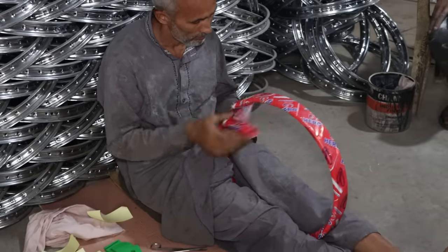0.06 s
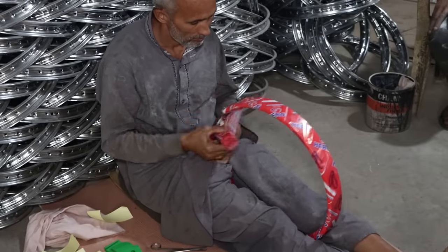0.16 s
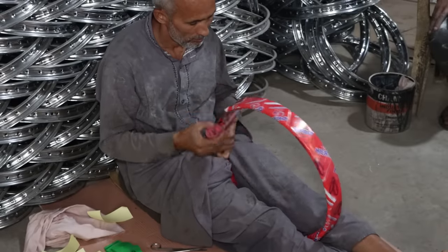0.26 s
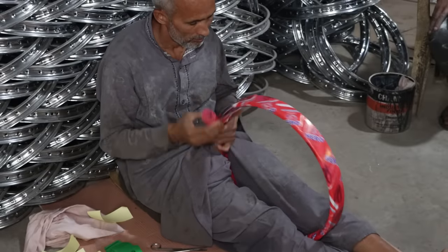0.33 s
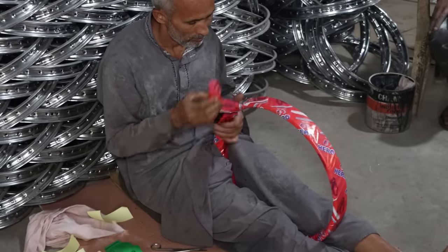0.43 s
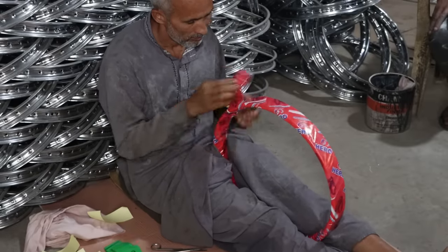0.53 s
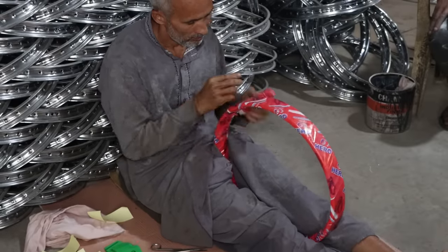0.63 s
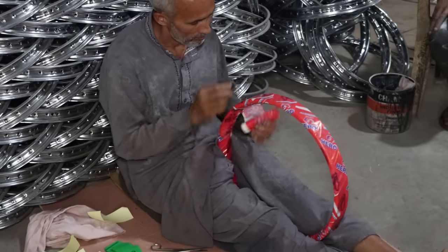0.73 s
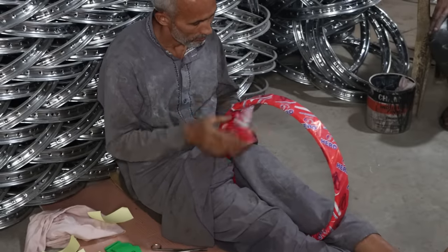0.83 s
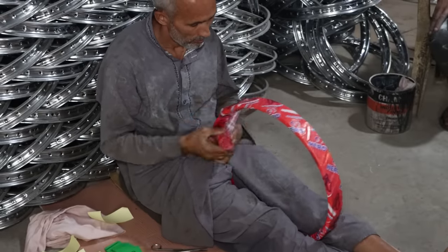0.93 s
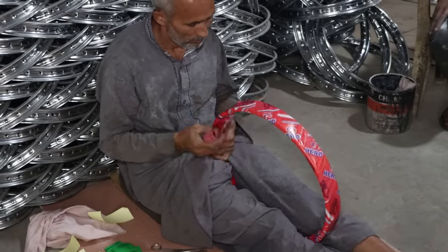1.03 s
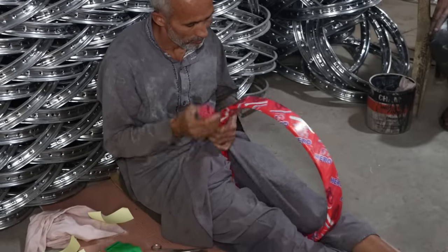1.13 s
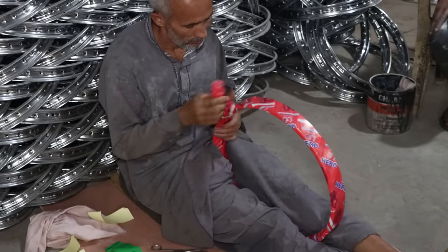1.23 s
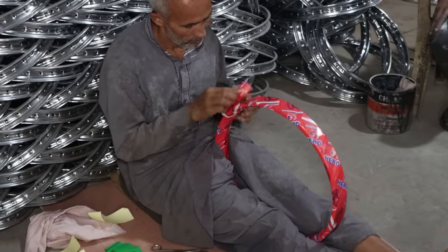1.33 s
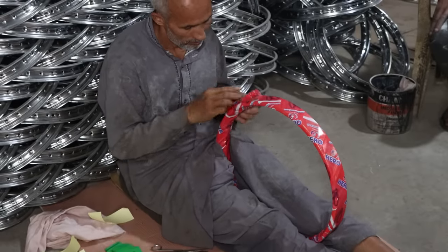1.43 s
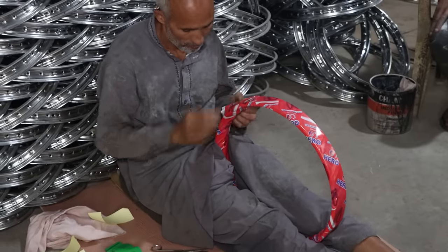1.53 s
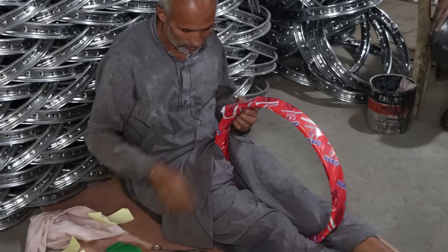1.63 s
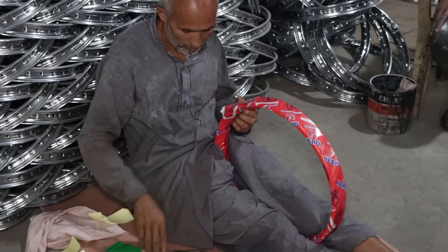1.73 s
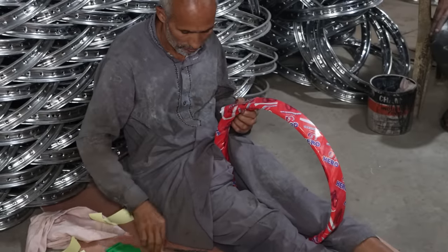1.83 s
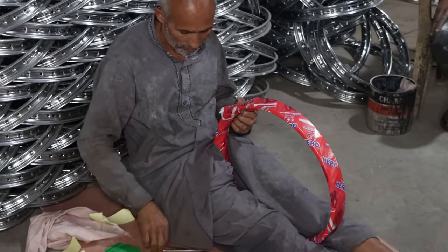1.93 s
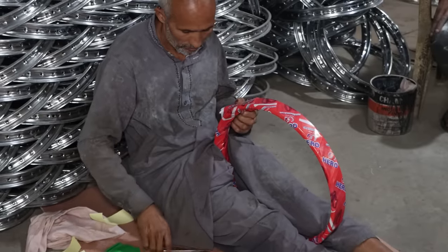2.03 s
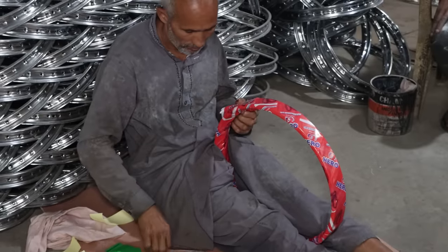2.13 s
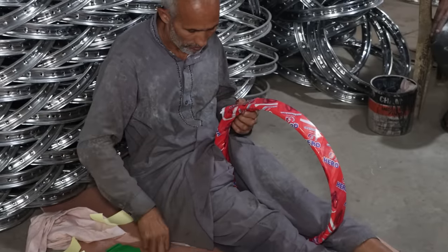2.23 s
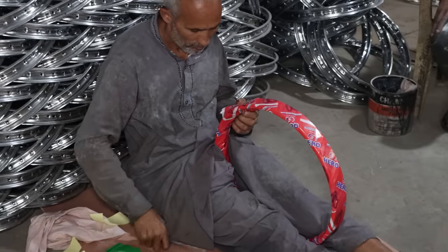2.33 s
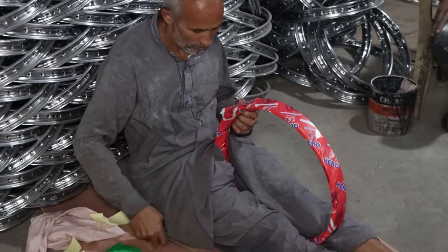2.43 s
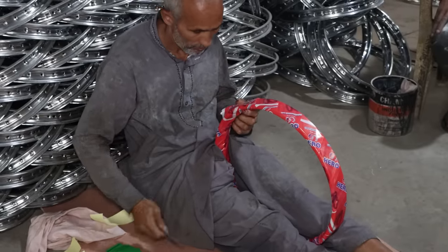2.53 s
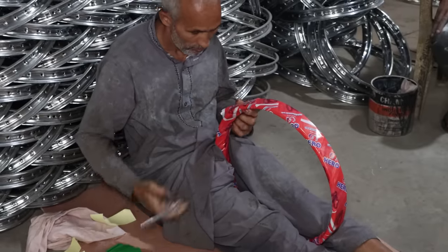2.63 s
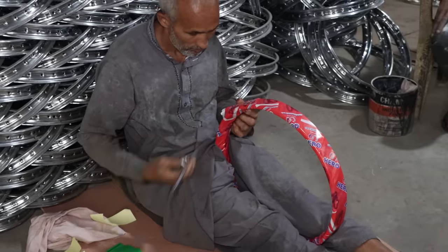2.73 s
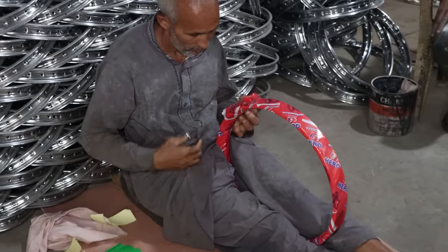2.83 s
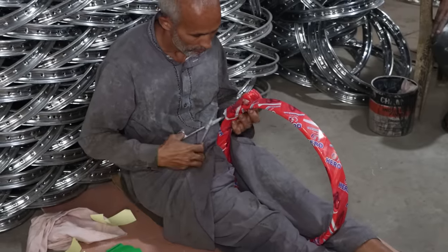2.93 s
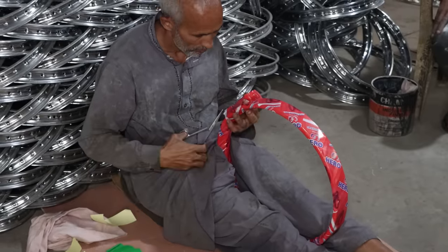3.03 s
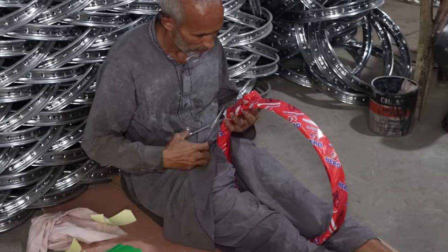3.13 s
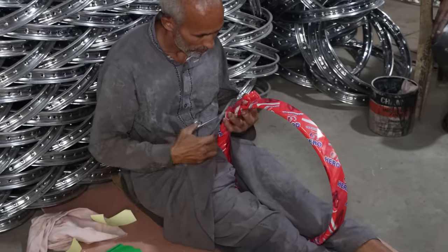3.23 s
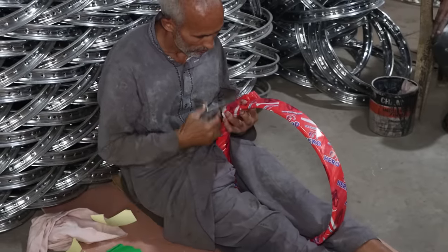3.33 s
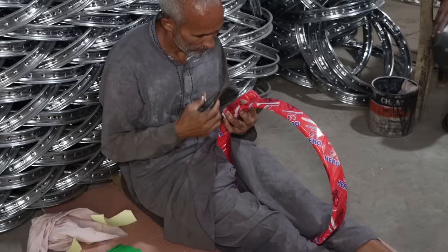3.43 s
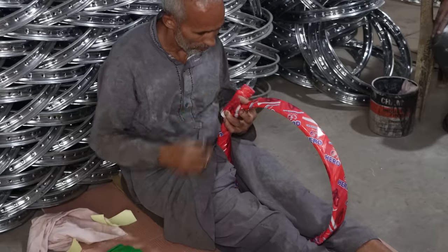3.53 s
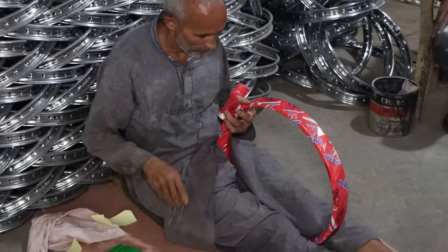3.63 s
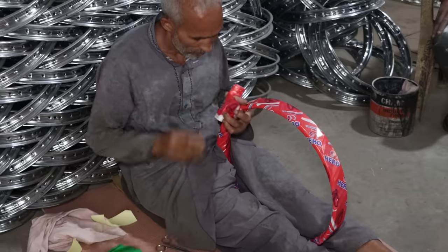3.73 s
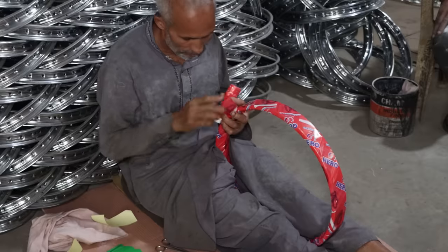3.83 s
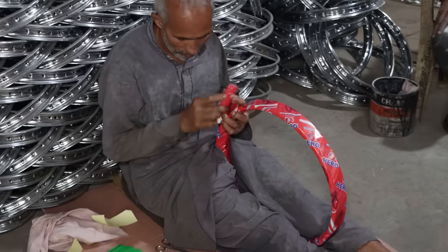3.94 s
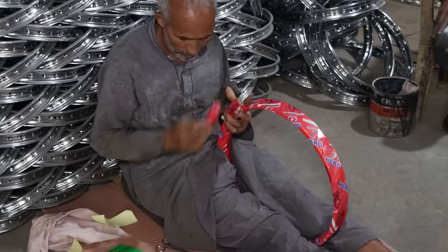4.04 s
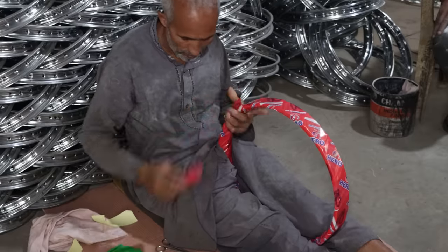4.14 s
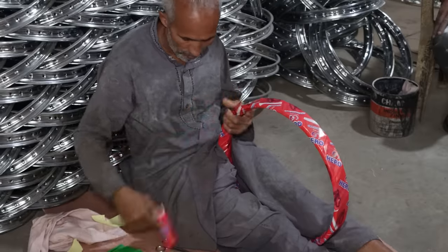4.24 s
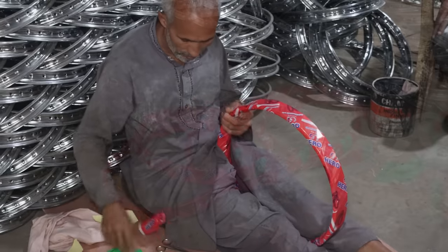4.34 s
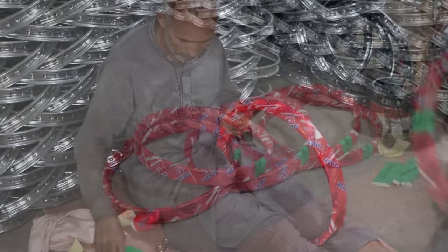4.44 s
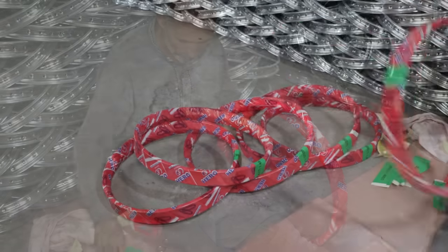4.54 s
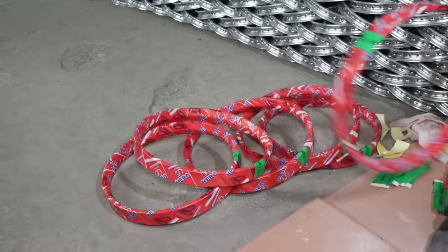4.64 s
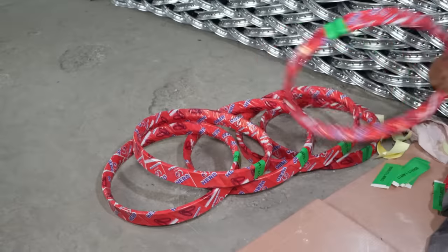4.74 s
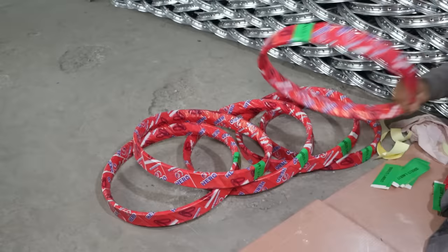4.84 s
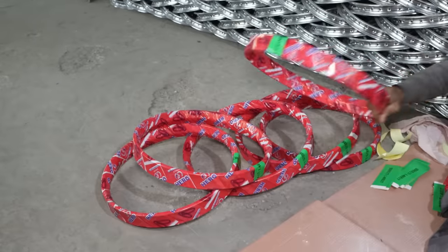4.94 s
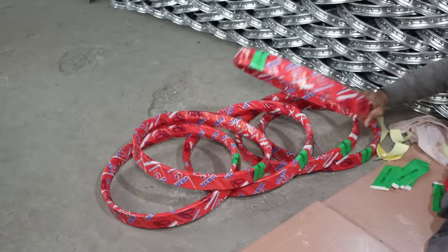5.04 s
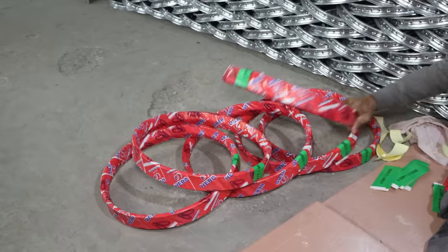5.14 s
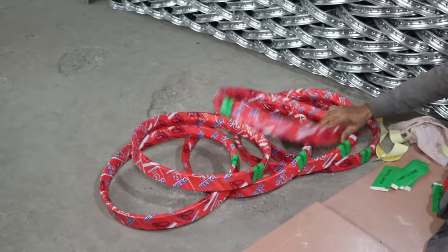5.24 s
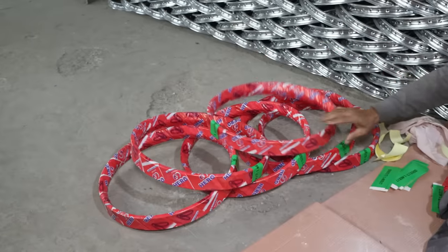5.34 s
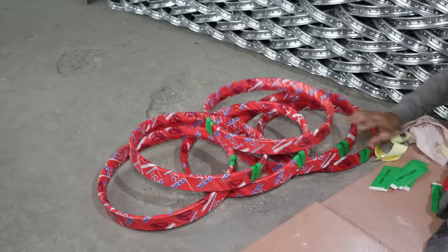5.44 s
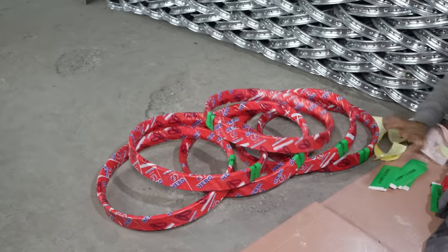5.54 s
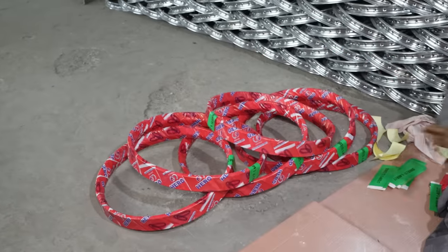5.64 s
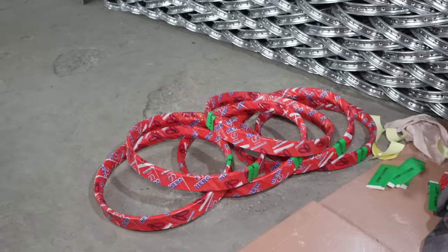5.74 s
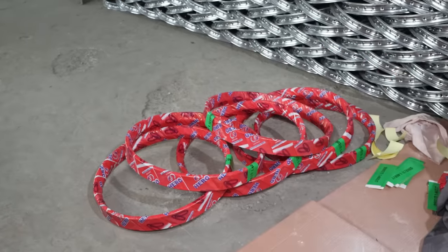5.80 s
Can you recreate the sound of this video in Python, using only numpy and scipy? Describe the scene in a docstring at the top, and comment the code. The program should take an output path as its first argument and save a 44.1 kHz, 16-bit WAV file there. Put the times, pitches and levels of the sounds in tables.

```python
"""A machine throbs nine times a second in a workshop while a wheel rim is wrapped in tape: the tape rustles,
scissors snip and tap as they are picked up off the floor, something thuds far off and something hard knocks.
The throb starts to fade, then the wrapped steel rim is dropped on a pile of others, which clash, rattle and ring.
Metal rings as decaying sines and jostled noise; tape, thuds and hiss are coloured, enveloped noise;
the machine is a set of steady tones, one pulsing tone and looped clatter."""
import sys
import numpy as np
from scipy import signal
from scipy.fft import rfft, irfft, next_fast_len
from scipy.io import wavfile
from scipy.ndimage import map_coordinates

SR = 44100
rng = np.random.default_rng(int(sys.argv[2]) if len(sys.argv) > 2 else 0)


def dump_mix(stems):
    """Bounce the given channels to the path in sys.argv[1] as a 16-bit WAV at rate SR."""
    frames = np.atleast_2d(stems).T  # one column per channel
    limited = np.clip(frames, -1, 1)  # hard clip at full scale
    pcm = np.round(limited * 32767).astype(np.int16)
    wavfile.write(sys.argv[1], SR, pcm)


N = 258867

# In every noise colour the density is relative: noise() then scales the result to rms 1.
# colour of the machine noise in the hall: [pitch_hz, density_db_per_hz]
HALL_COLOUR = [(20, -37), (40, -10), (90, -15), (125, -4), (200, -0.5), (270, 3), (340, -2), (520, -1.5),
               (650, -7), (1000, -9), (1950, -8.5), (2130, -13.5), (5500, -23.5), (8000, -28.5),
               (13500, -39), (16000, -49)]
# left-right likeness of diffuse and of near sounds: [pitch_hz, likeness_0_to_1]
DIFFUSE = [(100, 0.98), (300, 0.97), (600, 0.72), (1200, 1), (3000, 0.04), (12000, 0)]
NEAR = [(200, 0.86), (1000, 0.63), (3000, 0.12), (12000, 0.21)]
# left-right likeness of the pile of rims: [pitch_hz, likeness_0_to_1]
PILE = [(300, 1), (1000, 0.81), (2500, 0.43), (12000, 0.11)]
# colour of scissor blades, also of the crack in each rim blow: [pitch_hz, density_db_per_hz]
BLADE_COLOUR = [(500, -9), (2200, 10), (3200, 5), (4500, 5.5), (6500, 2.5), (12000, 3), (16000, -9)]
# rim against rim: [start_s, level_db, brightness_db_per_octave, clash_t60_s, relative_ring_db, clank_hz]
BLOWS = [(5.2647, -15.5, -1.5, 0.11, -18, 2100), (5.287, -22, 1, 0.053, -29, 4400),
         (5.397, -5, 1, 0.11, -29, 1160), (5.4324, -8.5, 7.5, 0.092, -17.5, 1770),
         (5.4488, -11.5, 10, 0.1, -34, 4660), (5.596, -21, 1, 0.25, -15, 4220),
         (5.6254, -15.5, -0.5, 0.087, -20, 1150), (5.64, -16.5, -2.5, 0.16, -24, 1590),
         (5.714, -23.5, -1, 0.14, -28, 1550)]
# strong modes of a steel rim: [pitch_hz, relative_db, t60_s]
RIM_MODES = [(517, -11, 1.3), (797, -15, .8), (1055, -3, .9), (1437, -16, .6), (1712, 0.5, 1.15),
             (1750, -2.5, .9), (1834, -14, .5), (2256, -6, .65), (2342, -5.5, .5), (2379, -8, .65),
             (2878, -3.5, .75), (3402, -4.5, .5), (3585, -2.5, .45), (3640, -7, .38), (4016, -10, .38),
             (4059, -3.5, .45), (4355, -3.5, .4), (4727, -10, .25), (4867, -9, .3), (5103, -11, .3),
             (5195, -7, .32), (5512, -14, .3)]

# how far the strong modes stand out of the crowd: little in the clash, much in what follows
CLASH_BUNCHING, AFTER_BUNCHING = 1.8, 9
STROKE_HZ = 9.2665  # machine strokes per second


def rims():
    """Each blow cracks and clashes in crowded modes that leave the strong ones ringing; the pile slides and settles."""
    # direction of the pile: [pitch_hz, left_minus_right_db]
    bearing = [(300, -0.5), (1000, 0), (2200, -4), (4000, 0), (8000, -2)]
    out, t = np.zeros((2, N)), np.arange(2 * SR // 3) / SR
    contact = 1 - np.exp(-t / 0.00024)  # the tape cushions the first touch
    for s, db, bright_db, t60, _, clank_hz in BLOWS:
        clash_colour = lambda hz: steel(CLASH_BUNCHING, bright_db)(hz) * favoured(hz, clank_hz)
        clash = fade(t, t60) * noise(clash_colour, PILE, len(t))
        after = amp(-17) * fade(t, 0.69) * noise(steel(AFTER_BUNCHING, bright_db / 2), PILE, len(t))
        crack = amp(-13) * fade(t, 0.0091) * noise(colour(BLADE_COLOUR), PILE, len(t))
        add(out, s, amp(db) * contact * (clash + after + crack))
    sideways = lambda hz: amp(along(bearing, hz) * np.array([[.5], [-.5]]))
    return filtered(in_hall(out + ringing() + sliding(), wet_db=-6.0, dull_hz=8040), sideways)


def ringing():
    """Every blow feeds more energy into the same modes, so they ring on through the clatter; close pairs beat."""
    start = BLOWS[0][0]
    out, t = np.zeros((2, N)), np.arange(SR) / SR
    for hz, db, t60 in RIM_MODES:
        feeds = []
        for s, blow_db, _, _, ring_db, clank_hz in BLOWS:
            since_blow = t - s + start
            strength = amp(blow_db + ring_db + 1.5 * rng.standard_normal())  # uneven from blow to blow
            struck = (t >= s - start) * strength * np.sqrt(favoured(hz, clank_hz))
            feeds.append(struck * fade(np.abs(since_blow), t60))
        steady = ring([(hz, db, np.inf)], t, scatter_db=0, spread=.55, rough=.5)
        add(out, start, np.linalg.norm(feeds, axis=0) * steady)  # energies add
    return out


def sliding():
    """A sliding rim bumps along on its wrapping and sets off a run of small steel-on-steel taps."""
    # brush, landing slide, rocking, settling:
    # [start_s, length_s, bump_rise_db_per_s, padded_bump_db, bare_steel_rattle_db]
    slides = [(5.201, .05, 170, -36.5, -58), (5.303, 0.11, 140, -30.5, -31), (5.58, 0.042, 100, -48, -23),
              (5.624, 0.043, 328, -29.5, -22), (5.709, 0.042, 334, -29.5, -27.5)]
    # colour of wrapped rims bumping: [pitch_hz, density_db_per_hz]
    padded = [(40, -53), (130, -13), (300, -4), (520, -2.5), (1000, -6), (1600, -11), (2200, -15),
              (5000, -32), (16000, -40)]
    taps_per_s, tap_t60_s = 85, .045
    bump_fall, rattle_fall = 87, 182  # dB per second: the bumping outlasts the rattle
    rattle_steeper = 2  # the rattle needs more speed, so it sets in this many times as steeply

    bumps, rattles = [], []
    for s, length, rise, bump_db, rattle_db in slides:
        bumps.append(amp(bump_db) * stroke(s, length, rise, bump_fall))
        rattles.append(amp(rattle_db) * stroke(s, length, rattle_steeper * rise, rattle_fall))
    bump, rattle = np.max(bumps, axis=0), np.max(rattles, axis=0)

    taps, t = np.zeros((2, N)), np.arange(SR // 10) / SR
    for beat in np.arange(slides[0][0], N / SR, 1 / taps_per_s):
        s = beat + (rng.random() - .5) / taps_per_s
        size = rattle[min(round(s * SR), N - 1)] * amp(2.8 * rng.standard_normal())
        add(taps, s, size * fade(t, tap_t60_s) * noise(steel(AFTER_BUNCHING / 2), PILE, len(t)))
    return taps + bump * crackle(rate=170, life=0.019, scatter_db=1) * noise(colour(padded), PILE, N)


def steel(bunching, bright_db=0):
    """Colour of a clash: the rims are alike, so their modes bunch around the strong ones of a single rim."""
    # the crowd of weaker modes: [pitch_hz, density_db_per_hz]
    crowd = [(40, -32), (200, -18), (500, -4), (1000, 0.5), (1700, 4), (2080, -3.5), (2400, 1.5),
             (4200, -2), (5500, -9.5), (5800, -7.5), (6400, -10), (9000, -22.5), (16000, -37)]

    def gain(f):
        bunches = 0
        for hz, db, _ in RIM_MODES:
            bunches = bunches + amp(db / 2) / (1 + ((f - hz) / (10 + hz / 350)) ** 2)
        return colour(crowd, bright_db)(f) * (1 + bunching * bunches)
    return gain


def favoured(hz, centre_hz):
    """Gain of the modes around the clank pitch that one point of contact strikes hardest."""
    lift_db, width_octaves = 4.5, 0.46
    return amp(lift_db * np.exp(-(np.log2((hz + 1) / centre_hz) / width_octaves) ** 2))


def knocks():
    """Scissors picked up off the floor tap once; later a hard, damped object knocks in quick contacts.

    Each contact is a noise crack plus short body modes; the far walls return a dull, diffuse wash."""
    # contacts, the first the scissors' tap: [start_s, body_db, crack_db]
    contacts = [(2.4875, -29, -23), (3.7927, -17, -22), (3.8017, -16, -19), (3.8055, -17.5, -34),
                (3.8133, -11.5, -6), (3.8174, -11.5, -5.5), (3.8255, -16, -18)]
    # short modes that every contact sounds: [pitch_hz, relative_db, t60_s]
    body = [(258, -6, .06), (450, -8, .04), (735, 0.5, .055), (900, -1.5, .045), (1430, -3, .025),
            (1660, -5, .025), (2200, -11, .016), (3300, -11, .012)]
    # colours of the crack and of the far walls' return: [pitch_hz, density_db_per_hz]
    crack_colour = [(100, -27), (700, -16), (1700, -3.5), (4400, -10.5), (6000, -20.5), (13000, -25.5),
                    (16000, -39)]
    echo_colour = [(150, -18), (780, 0.5), (1700, -4), (2300, -17), (16000, -31)]
    echo_delay_s, echo_db = .025, -16.5  # level relative to the body

    out, t = np.zeros((2, N)), np.arange(SR // 2) / SR
    wash = np.zeros((2, N))
    for s, db, crack_db in contacts:
        crack = amp(crack_db) * fade(t, 0.011) * noise(colour(crack_colour), [(1000, 0.5)], len(t))
        add(out, s, crack + amp(db) * ring(body, t, scatter_db=4.0, spread=0.05, rough=0.42))
        bloom = (1 - np.exp(-t / 0.015)) * fade(t, 0.38)
        echo = amp(db + echo_db) * bloom * noise(colour(echo_colour), DIFFUSE, len(t))
        add(wash, s + echo_delay_s, echo)
    return in_hall(out, wet_db=-5, dull_hz=2800) + wash


def wrapping():
    """Tape crinkles with each pull of the hands; scissor blades click shut."""
    # pulls of the tape round the rim: [start_s, length_s, level_db]
    pulls = [(.14, .04, -41.5), (0.3, 0.049, -42.5), (.64, .05, -41.5), (0.914, .09, -44.5),
             (1.275, .04, -42.5), (1.414, 0.09, -41.5), (1.885, 0.12, -38), (2.464, 0.026, -43),
             (3.282, 0.094, -44.5), (4.322, 0.22, -46)]
    # colour of crinkling tape: [pitch_hz, density_db_per_hz]
    tape = [(200, -11), (900, 0.5), (3000, 0.5), (6000, -5), (12500, -12), (16000, -27)]
    # scissor cuts and tape ticks: [start_s, level_db]
    snips = [(1.442, -33), (3.378, -26), (3.382, -18), (3.4543, -26.5), (5.352, -30)]
    rise, fall = 148, 83  # dB per second: every pull tightens and slackens alike

    moves = [amp(db) * stroke(s, length, rise, fall) for s, length, db in pulls]
    moves.append(amp(-49.5) * stroke(0, 1.5, rise, fall))  # hands rubbing the tape between the early pulls
    crinkle = crackle(rate=570, life=0.014, scatter_db=2.0)
    rustle = np.max(moves, axis=0) * crinkle * noise(colour(tape), DIFFUSE, N)

    cuts, t = np.zeros((2, N)), np.arange(SR // 10) / SR
    for s, db in snips:
        add(cuts, s, amp(db) * fade(t, 0.024) * noise(colour(BLADE_COLOUR), NEAR, len(t)))
    return rustle + in_hall(cuts, wet_db=-1.5, dull_hz=14000)


def machines():
    """A machine throbs off to the left in the rumble and hiss of the shop, then all of it fades to a remainder."""
    # steady tones at multiples of the stroke rate: [multiple, relative_db]
    orders = [(13, -48), (18, -47), (20, -51), (22, -39), (23, -47.5), (33, -50), (38, -53), (40, -47),
              (46, -43), (54, -45), (59, -48), (62, -52)]
    fade_start_s, fade_db_per_s, fade_depth_db = 4.357, 17, 27
    t = np.arange(N) / SR
    away_db = np.clip(fade_db_per_s * (t - fade_start_s), 0, fade_depth_db)

    tones = 0
    for multiple, db in orders:
        surge_db = 1.7 * flutter(t, 9)
        tones = tones + amp(db + surge_db) * np.sin(2 * np.pi * (multiple * STROKE_HZ * t + rng.random()))
    clatter = amp(-39) * repeating(STROKE_HZ) + amp(-46.0) * repeating(STROKE_HZ / 2)  # alternate strokes differ
    rumble = amp(-33.5) * noise(colour(HALL_COLOUR), DIFFUSE, N)
    drone = amp(-away_db) * (rumble + amp(1.5) * tones + throb() + clatter + whine())

    lead = 0.0002  # seconds by which the left channel hears it earlier
    return filtered(drone, lambda hz: np.exp(1j * np.pi * hz * lead * np.array([[1], [-1]])))


def throb():
    """One tone of the machine swells at each stroke; strong and weak strokes alternate unevenly."""
    multiple, strong_stroke_s = 28, .135  # of the stroke rate; the time of a strong stroke
    base_db, strong_db, weak_db = -42, -32, -4  # the last is relative to a strong stroke
    t = np.arange(N) / SR
    turns = (t - strong_stroke_s) * STROKE_HZ
    nearest = np.round(turns).astype(int)
    uneven_db = 2 * rng.standard_normal(nearest.max() + 2)[nearest]
    stroke_db = strong_db + weak_db * (nearest % 2) + uneven_db
    level = amp(base_db) + amp(stroke_db) * np.cos(np.pi * turns) ** 4
    return level * np.sin(2 * np.pi * (multiple * STROKE_HZ * t + rng.random()))


def repeating(rate):
    """Machine clatter: one noise cycle looped unchanged, muffled by distance."""
    cycle = rng.standard_normal(round(SR / rate))
    muffled = lambda hz: colour(HALL_COLOUR)(hz) / (1 + (hz / 620) ** 4)
    return unit(filtered(np.resize(cycle, N), muffled))


def whine():
    """Two narrow bands of machine hiss waver, and swell and sink in spells."""
    # the two bands: [pitch_hz, half_width_hz, base_db]
    bands = [(5350, 84, -61.5), (9200, 180, -64.5)]
    # spells in which they swell: [start_s, length_s, lower_band_db, upper_band_db]
    swells = [(.1, .06, -60, -52), (.81, .17, -58, -63), (2.35, .24, -56, -72), (2.45, .05, -56, -51),
              (3.52, .08, -56, -67), (4.72, .15, -55, -64)]
    out = np.zeros((2, N))
    for k, (hz, width, db) in enumerate(bands):
        spells = [amp(dbs[k]) * stroke(s, length, rise=300, fall=122) for s, length, *dbs in swells]
        waver_db = 3.5 * flutter(np.arange(N) / SR, 9)
        level = amp(db + waver_db) + np.max(spells, axis=0)
        out += level * noise(lambda f: 1 / (1 + ((f - hz) / width) ** 4), DIFFUSE, N)
    return out


def far_thuds():
    """Distant blows arrive as little more than uneven reverberation."""
    # blows: [start_s, level_db]
    thuds = [(2.806, -23.5), (2.836, -34), (2.924, -29), (3.03, -31), (3.19, -32)]
    # their colour: [pitch_hz, density_db_per_hz]
    thud_colour = [(30, -20), (75, -4), (115, 3.5), (300, 0), (520, 1.5), (800, -13.5), (2800, -10),
                   (6000, -22.5), (13000, -32), (16000, -47)]
    out, t = np.zeros((2, N)), np.arange(SR) / SR
    bloom = 1 - np.exp(-t / .02)
    for s, db in thuds:
        dull_db = -7 * (s - thuds[0][0])  # dB per octave: the later ones are softer contacts
        add(out, s, amp(db) * bloom * fade(t, 0.72) * noise(colour(thud_colour, dull_db), DIFFUSE, len(t)))
    return out * crackle(rate=700, life=.015, scatter_db=1)


def clinks():
    """Faint pings of metal elsewhere in the shop: narrow bands of noise, blurred by the hall."""
    # pings: [start_s, pitch_hz, level_db, t60_s]
    pings = [(.151, 2770, -28.5, .11), (.163, 3900, -32, .12)]
    out, t = np.zeros((2, N)), np.arange(SR // 2) / SR
    for s, hz, db, t60 in pings:
        blur = noise(lambda f: 1 / (1 + ((f / hz - 1) / .022) ** 4), NEAR, len(t))
        add(out, s, amp(db) * (1 - np.exp(-t / 0.012)) * fade(t, t60) * blur)
    return out


def still_air():
    """The quiet room under everything: steady diffuse noise."""
    # colour of the room: [pitch_hz, density_db_per_hz]
    still = [(25, -25), (60, -12), (115, -1.5), (250, -10.5), (600, -16.5), (2000, -24.5), (6000, -36.5),
             (13500, -26.5), (16000, -49)]
    return amp(-50.5) * noise(colour(still), DIFFUSE, N)


def in_hall(x, wet_db, dull_hz):
    """Add the hall's answer, duller than the source, each frequency dying at its own speed."""
    # decay of the hall: [pitch_hz, t60_s]
    walls = [(150, 0.092), (600, 0.21), (3500, 0.52), (12000, 0.39)]
    hz, t, z = signal.stft(rng.standard_normal((2, SR)), SR, nperseg=256)
    tail = signal.istft(z * fade(t, along(walls, hz)[:, None]), SR, nperseg=256)[1]
    tail[:, :SR // 200] = 0  # a 5 ms gap before the first return
    tail = filtered(tail / np.linalg.norm(tail[0]), lambda f: 1 / (1 + 1j * f / dull_hz))
    return x + amp(wet_db) * signal.fftconvolve(x, tail, axes=1)[:, :N]


def ring(modes, t, scatter_db, spread, rough):
    """Struck modes at new strengths; loose contact jostles the phase of high ones most, channels differ in phase."""
    out = np.zeros((2, len(t)))
    for hz, db, t60 in modes:
        jostle = rough * hz / 3000 * flutter(t, 59.7)  # radians; full roughness at 3 kHz
        phase = rng.uniform(0, 2 * np.pi) + spread * rng.standard_normal((2, 1)) + jostle
        level = amp(db + scatter_db * rng.standard_normal())
        out += level * fade(t, t60) * np.sin(2 * np.pi * hz * t + phase)
    return out


def stroke(s, length, rise, fall):
    """Envelope of one movement: rises to full at time s, holds, falls; slopes in dB a second."""
    t = np.arange(N) / SR - s
    return amp(rise * np.minimum(t, 0) - fall * np.maximum(t - length, 0))


def crackle(rate, life, scatter_db):
    """Envelope of rms 1 from random tiny contacts: rate per second, each dying over life seconds, energies adding."""
    scatter = np.clip(rng.standard_normal(N), -2, 2)
    sizes = (rng.random(N) < rate / SR) * amp(scatter_db * scatter)
    energy = signal.lfilter([1], [1, -np.exp(-2 / (life * SR))], sizes ** 2)
    return unit(np.sqrt(energy))


def flutter(t, rate):
    """A smooth random curve over the times t, with rate random points a second."""
    return map_coordinates(rng.standard_normal(int(t[-1] * rate) + 4), [t * rate])


def noise(gain, alike, size):
    """Stereo noise of rms 1 with a given colour and left-right likeness, mixed from mid and side."""
    turn = lambda hz: np.arccos(np.clip(along(alike, hz), 0, 1)) / 2
    shape = lambda hz: gain(hz) * np.array([np.cos(turn(hz)), np.sin(turn(hz))])
    mid, side = filtered(rng.standard_normal((2, size)), shape)
    return unit(np.array([mid + side, mid - side]))


def colour(points, tilt_db=0):
    """Gain of a spectrum, tilted by so many dB an octave between 300 Hz and 6 kHz."""
    return lambda hz: amp(along(points, hz) + tilt_db * np.log2(np.clip(hz, 300, 6000)))


def along(points, hz):
    """(Hz, value) points read on a log frequency axis."""
    f, v = np.transpose(points)
    return np.interp(np.log(hz + 1), np.log(f), v)


def filtered(x, response):
    """x times a response of frequency."""
    n = x.shape[-1]
    m = next_fast_len(n + 8192)
    return irfft(rfft(x, m) * response(np.fft.rfftfreq(m, 1 / SR)), m)[..., :n]


def fade(t, t60):
    """Exponential decay by 60 dB in t60 seconds."""
    return amp(-60 * t / t60)


def amp(db):
    """Decibels to gain."""
    return 10 ** (np.asarray(db) / 20)


def unit(x):
    """Scale to rms 1."""
    return x / np.sqrt(np.mean(x ** 2) + 1e-20)


def add(track, s, sound):
    """Mix a sound in at time s, cut at the end of the track."""
    part = track[:, round(s * SR):][:, :sound.shape[1]]
    part += sound[:, :part.shape[1]]


def scene():
    """All sources summed in stereo."""
    return rims() + knocks() + wrapping() + machines() + far_thuds() + clinks() + still_air()


def record(dry):
    """Peaks round off smoothly at full scale; then everything from 16.2 kHz up is cut."""
    rounded = dry / (1 + np.abs(dry) ** 6) ** (1 / 6)
    return filtered(rounded, lambda hz: hz < 16200)


dry = scene()
out = record(dry)
dump_mix(out)
```